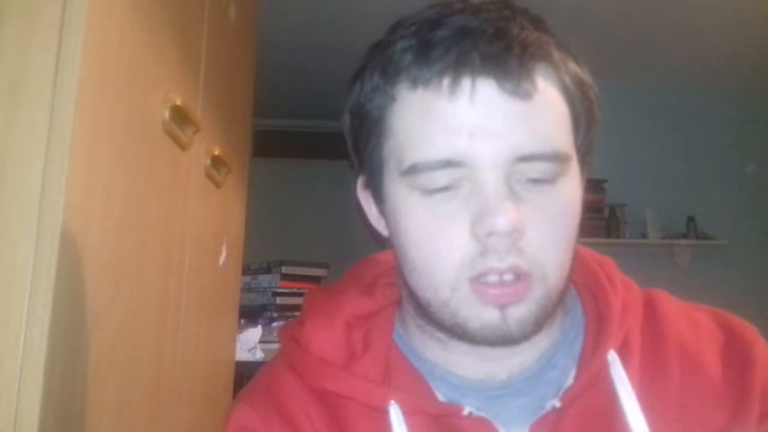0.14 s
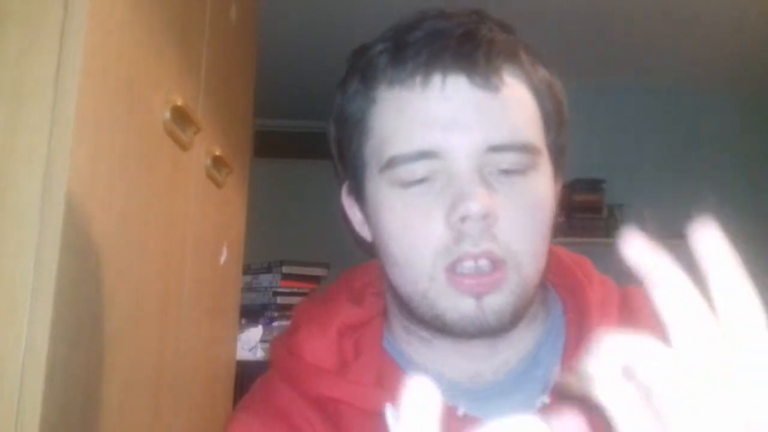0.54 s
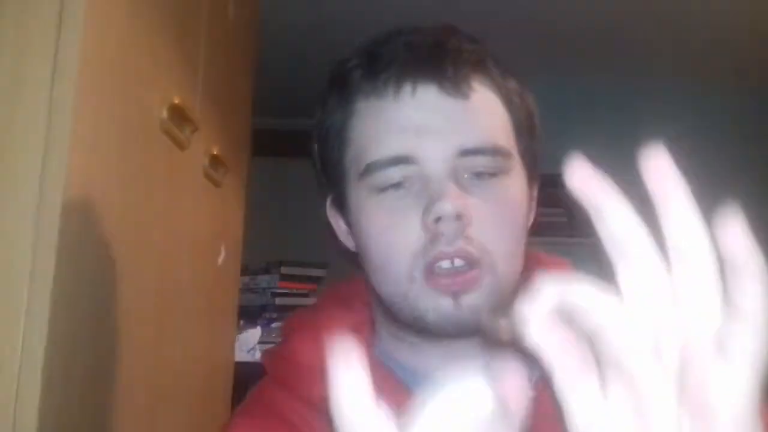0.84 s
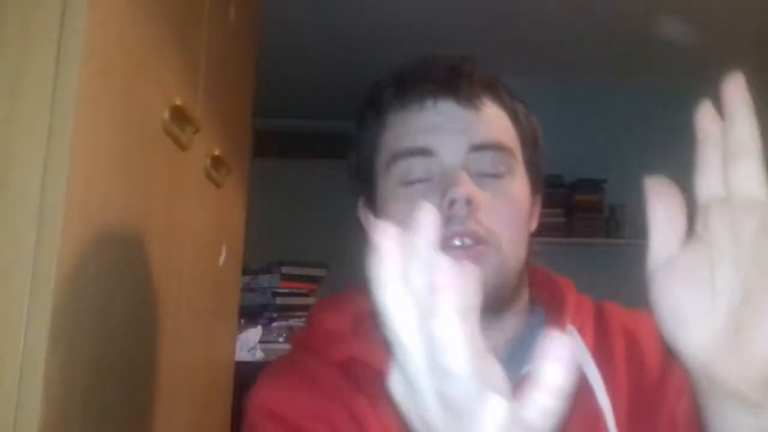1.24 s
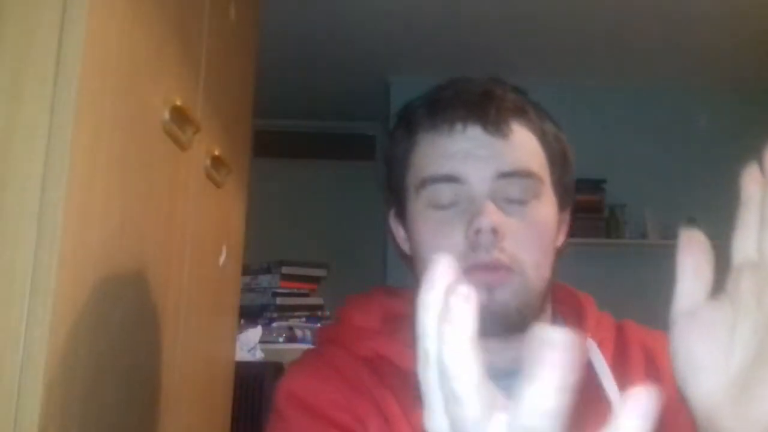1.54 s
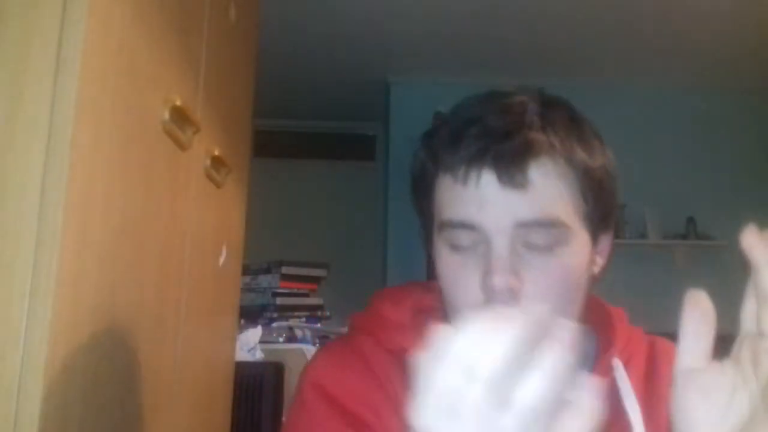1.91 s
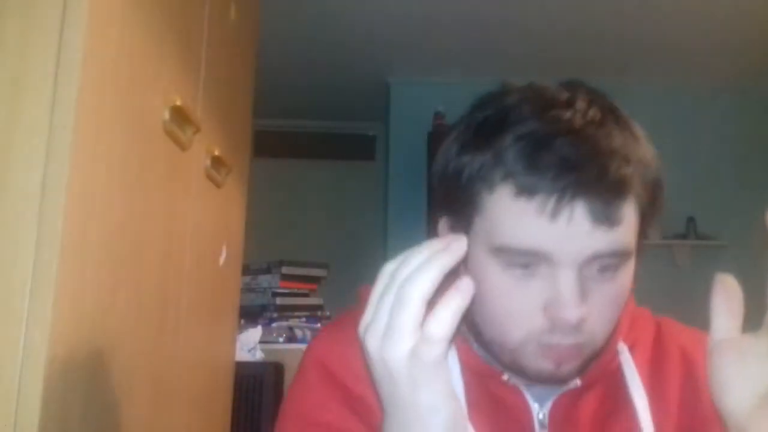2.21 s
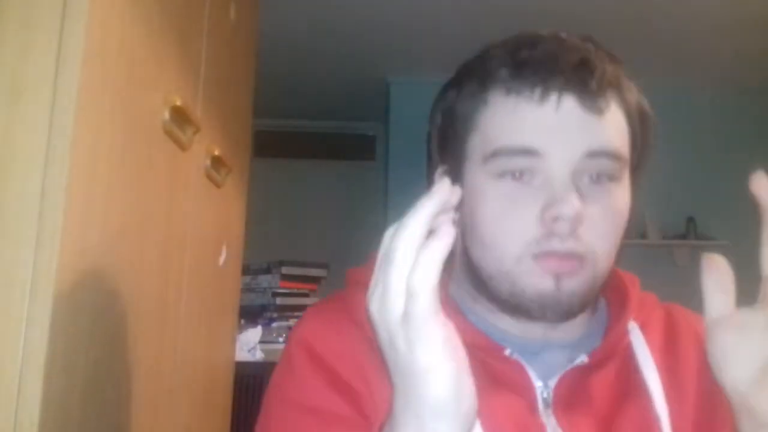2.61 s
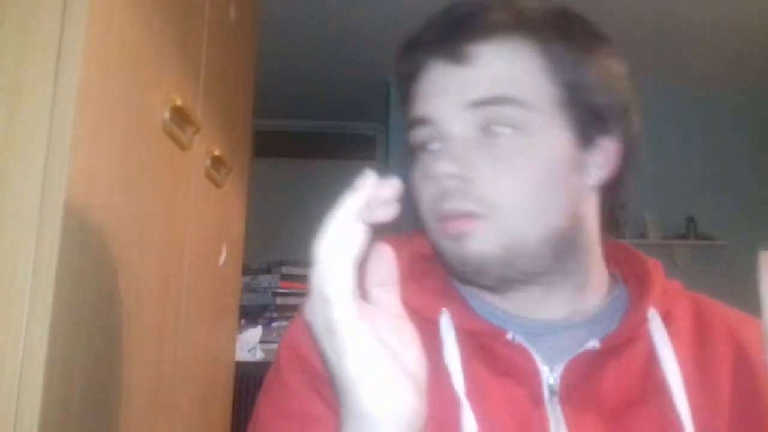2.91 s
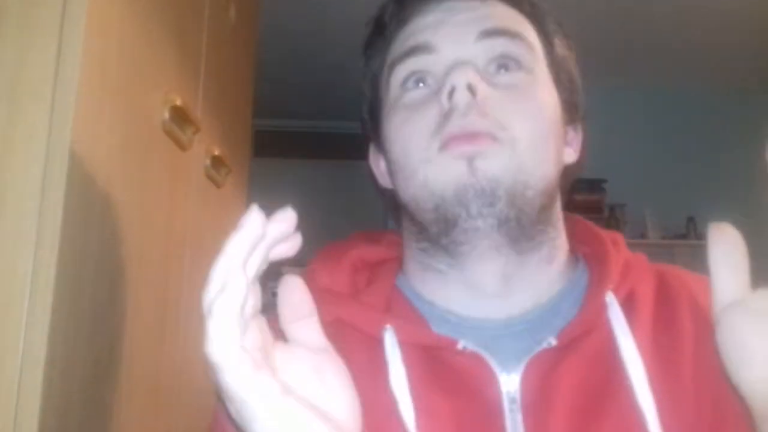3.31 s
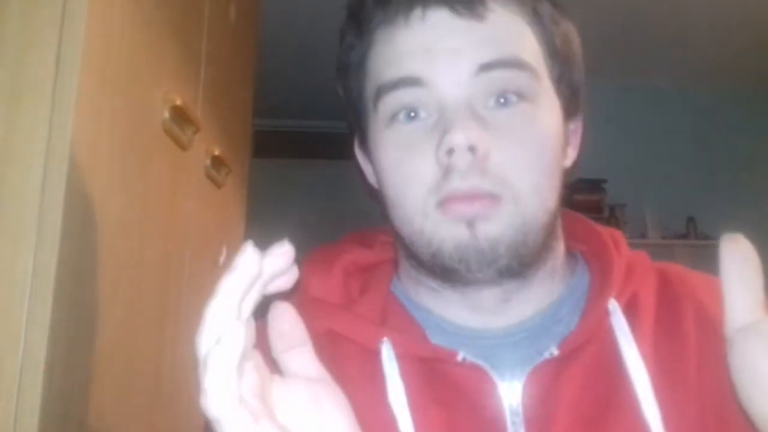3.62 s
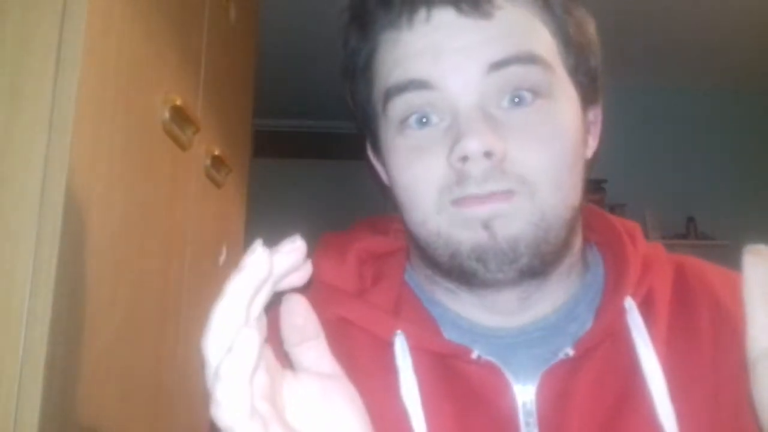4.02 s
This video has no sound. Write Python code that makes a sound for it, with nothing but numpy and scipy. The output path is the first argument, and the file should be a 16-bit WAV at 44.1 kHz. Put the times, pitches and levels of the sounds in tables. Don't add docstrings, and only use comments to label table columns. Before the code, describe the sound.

In a small quiet bedroom, soft finger thumps and nail clicks precede a coin knocking loudly on a wooden desk, bouncing and rattling away.

```python
import sys
import numpy as np
from scipy import signal
from scipy.fft import rfft, irfft
from scipy.io import wavfile
from scipy.ndimage import uniform_filter1d

SR = 44100
rng = np.random.default_rng(int(sys.argv[2]) if len(sys.argv) > 2 else 0)


def materialize(psi):
    bounded = np.clip(np.atleast_2d(psi).T, -1, 1)
    quanta = np.round(bounded * 32767).astype(np.int16)
    wavfile.write(sys.argv[1], SR, quanta)


def attenuation_scalar(level_db):
    decades = np.asarray(level_db, float) / 20
    return 10 ** decades


N = 183015

# (frequency [Hz], level [dB])
AIR_SPECTRUM = [(30, -21), (100, -2.5), (220, -1), (600, -4.5), (1500, -7), (3000, -15.5), (4200, -23.5),
                (5000, -34.5)]
# (frequency [Hz], level [dB])
HISS_SPECTRUM = [(20, -8.5), (200, 1), (1000, -1.5), (3500, -6.5), (4800, -14.5), (13000, -14),
                 (16000, -21.5)]
# (frequency [Hz], width [Hz], level [dB])
HISS_DIPS = [(5100, 1600, -3), (10020, 780, -10), (14850, 250, 5)]
# (time [s], level [dB])
GAIN_DRIFT = [(0, 4), (.4, 0), (1, 0), (1.9, 0.5), (2.399, 3), (3, 0), (3.4, 3), (3.7, -1), (4.15, -1.5)]
# (frequency [Hz], level [dB])
MICROPHONE_RESPONSE = [(40, -39.5), (150, -8), (1000, -3.5), (4050, 1), (4500, -6), (5800, -19.5),
                       (10000, -36), (16000, -48)]
# (frequency [Hz], decay time T60 [s])
ROOM_DECAY = [(200, 0.44), (600, 0.24), (1500, 0.36), (3300, 0.35), (8000, 0.43), (13000, 0.16)]
# (frequency [Hz], level [dB])
LANDING_PATHS = [
    [(100, -3), (330, -5), (650, 2.5), (2200, 2.5), (4200, -4.5), (5200, -16.5), (7500, -3.5),
     (15000, -19.5)],
    [(70, 1.5), (280, -3.5), (450, -4), (1900, 2.5), (2800, 4.5), (5000, 5.5), (9000, -3.5), (13000, 2.5)],
    [(150, -9.5), (1100, -2.5), (3300, 0.5), (4300, -3), (5300, -1.5), (7000, -7), (9000, -15),
     (15000, -14)],
]

# (strongest moment [s], length [s], dull folds [dB], bright grain [dB])
RUSTLES = [(1.011, 0.088, -45, -59.5), (1.692, 0.021, -69, -61.5), (1.786, 0.037, -59, -68),
           (2.111, 0.027, -52, -73), (2.399, 0.074, -58.5, -63), (2.522, .05, -64, -69),
           (2.785, 0.038, -84, -63.5), (2.872, 0.022, -66, -66), (2.954, .16, -66, -66),
           (3.131, 0.13, -58.5, -77.5), (3.216, 0.04, -59, -93), (3.366, 0.13, -64, -77.5)]
# (time [s], blow [dB], pitch [Hz], swings before it dies [count])
FINGER_THUMPS = [(.937, -40, 600, 4.8), (.9442, -21, 770, 3), (.9508, -24.5, 750, 4.6),
                 (.9527, -14.5, 800, 1.34), (.9595, -27, 490, 6.3), (.9680, -38, 634, 3.4),
                 (1.0003, -47, 460, 4.5), (1.0070, -38, 630, 4.9), (1.0160, -34, 493, 4.7),
                 (1.0255, -41, 480, 4.5), (1.0505, -28.5, 503, 7.2), (1.0570, -24.5, 625, 1.5),
                 (1.378, -54, 253, 24), (1.402, -52, 100, 8.4), (1.6772, -29.5, 450, 8.2),
                 (1.6845, -28.5, 767, 3.8), (1.780, -46, 480, 5.3), (1.787, -44, 587, 9),
                 (2.114, -40.5, 295, 4.1), (2.122, -41.5, 800, 11), (2.398, -36, 770, 4.5),
                 (2.510, -50, 800, 6.4), (2.5148, -39, 790, 8.5), (2.519, -35, 770, 5.8),
                 (2.526, -43, 604, 2.7), (2.5305, -33, 437, 2.2), (2.768, -43.5, 445, 5.9),
                 (2.848, -38.5, 344, 2.2), (3.046, -48, 745, 14)]
# (time [s], blow [dB], pitch [Hz], ring T60 [ms], tick [dB])
NAIL_CLICKS = [
    (0.0514, -25.5, 3080, 1.34, 9),
    (0.0908, -55, 3470, 15, -12),
    (0.578, -47.5, 1430, 16, -10),
    (1.1251, -28.5, 1920, 5.8, 8),
    (1.1256, -38, 3640, 7.8, -7),
    (1.1277, -24, 2660, 2.14, 11),
    (1.135, -38, 1000, 3.8, -10),
    (1.1438, -49, 2680, 12, -17),
    (1.145, -50, 2040, 11, -12),
]
# (time [s], blow [dB], pitch [Hz])
FLOOR_RATTLE = [
    (2.7698, -40, 1360),
    (2.77, -48.5, 3000),
    (2.847, -37, 1440),
    (2.848, -49.5, 3180),
    (2.856, -42, 1600),
    (2.865, -48, 1490),
    (3.077, -37, 800),
]

# (time [s], blow [dB], contact
# pitch [Hz], tick [dB])
DESK_CONTACTS = [
    (1.9137, -6.5, 1310, -32.5),
    (1.9172, -3, 3000, -17),
    (1.9192, -8.5, 960, -28.5),
    (1.9206, -7, 3240, -25),
]
BOUNCE_CONTACTS = [
    (2.1903, -33.5, 2930, 7.5),
    (2.1930, -12, 1183, -21),
    (2.1939, -18.5, 3570, -15),
    (2.1960, -15.5, 1850, 0.5),
    (2.1985, -8.5, 3750, -1),
    (2.2007, -6.5, 1666, -10),
    (2.2030, -9.5, 1600, -9.5),
    (2.2085, -31, 1793, -9),
    (2.2155, -13, 2560, -5.5),
    (2.2225, -22.5, 2188, -19.5),
]
LATE_BOUNCE_CONTACTS = [
    (2.255, -22.5, 1830, -18),
    (2.288, -32.5, 4130, 6),
    (2.296, -34, 1950, -2),
    (2.316, -50, 3800, 10),
    (2.33, -44, 1900, -3),
]
REBOUND_CONTACTS = [
    (2.5884, -23.5, 3120, 0.5),
    (2.5910, -26, 3300, 8.5),
    (2.5960, -22, 3570, -20),
    (2.608, -48, 3300, 0),
]
# (frequency [Hz], width [Hz], level [dB])
DESK_TOP_MODES = [(466, 47, 8.5), (800, 190, -1.5), (1150, 100, 0.5), (1577, 18, 0), (2930, 90, -33),
                  (3240, 330, -3), (3800, 500, -5.5)]
DESK_EDGE_MODES = [(480, 29, 0.5), (737, 290, 6), (787, 84, 0.5), (1600, 64, 9), (1850, 140, 3.5),
                   (3300, 350, -11.5), (3800, 220, -1.5), (4100, 62, -1), (6400, 430, -5),
                   (12400, 3900, 0.5)]
FLOOR_BOARD_MODES = [(163, 250, 9), (463, 37, 16.5), (1000, 320, -4), (1950, 690, -5.5), (3300, 74, 0),
                     (5190, 250, -3)]


def read(points, hz):
    f, value = np.transpose(points)
    return np.interp(np.log(hz + 1), np.log(f + 1), value)


def evened(x):
    return x / np.sqrt(np.mean(x ** 2) + 1e-20)


def add(mix, s, sound):
    part = mix[round(s * SR):][:len(sound)]
    part += sound[:len(part)]


def ring(hz, t60, size=2048, rise=1e-5):
    t = np.arange(size) / SR
    return attenuation_scalar(-60 * t / t60) * np.sin(2 * np.pi * hz * t) * (1 - np.exp(-t / rise))


def causal(points, size=4096):
    hz = abs(np.fft.fftfreq(size, 1 / SR))
    log_gain = np.log(attenuation_scalar(read(points, hz)))
    phase = -signal.hilbert(log_gain).imag
    return np.fft.ifft(np.exp(log_gain + 1j * phase)).real[:size // 2]


def noise(db, count=1):
    hz = np.fft.rfftfreq(N, 1 / SR)
    spectrum = rfft(rng.standard_normal((count, N))) * attenuation_scalar(db(hz))
    return evened(irfft(spectrum, N))


def room_air():
    return attenuation_scalar(-71.5) * noise(lambda hz: read(AIR_SPECTRUM, hz) - 60 * (hz > 6000))


def circuit_hiss():
    def level(hz):
        dips = sum(db / (1 + (2 * (hz - f) / width) ** 2) for f, width, db in HISS_DIPS)
        return read(HISS_SPECTRUM, hz) + dips

    gain_db = np.interp(np.arange(N) / SR, *np.transpose(GAIN_DRIFT))
    return attenuation_scalar(-69.5 + gain_db) * noise(level, count=2)


def echoes(dryness=0.66, gap=0.00085, swell=0.0062, early_db=8, early_s=0.0097, size=20000):
    taps, t = np.zeros(size), np.arange(size) / SR
    slots = np.arange(0, size - 16, 16)
    place, sign, uneven = rng.random((3, len(slots)))
    taps[slots + (16 * place).astype(int)] = np.sign(sign - .5) * attenuation_scalar(-12 * uneven)
    hz, spectrum = np.fft.rfftfreq(size, 1 / SR), rfft(taps)
    centres = np.array(ROOM_DECAY)[:, 0]
    tail = np.zeros(size)
    for row, (_, t60) in zip(np.eye(len(centres)), ROOM_DECAY):
        share = read(np.transpose([centres, row]), hz)
        tail += irfft(spectrum * share, size) * attenuation_scalar(-60 * dryness * t / t60)
    onset = np.clip((t - gap) / swell, 0, 1)
    near_walls = 1 + attenuation_scalar(early_db) * np.exp(-t / early_s)
    tail = tail * onset * near_walls
    return tail / np.linalg.norm(tail)


def sweater():
    t, out = np.arange(N) / SR, np.zeros(N)
    rise_db, folds_fall_db, grain_fall_db = 15.5, 20.5, 11.5
    strength = attenuation_scalar(3.0 * np.minimum(rng.exponential(1, N), 4))
    caught = rng.random(N) < 800 / SR
    grains = rng.standard_normal(N) * (.5 + strength * caught)
    fold_modes = ring(240, 0.016, rise=0.002) + .25 * ring(90, 0.044) + 0.45 * ring(500, .012)
    fibre_modes = ring(1600, .0016) - ring(3200, .0014)
    folds = evened(signal.fftconvolve(grains, fold_modes)[:N])
    rubbing = evened(signal.fftconvolve(grains[::-1], fibre_modes)[:N])
    for s, length, folds_db, grain_db in RUSTLES:
        before, after = np.maximum(s - t, 0) / length, np.maximum(t - s, 0) / length
        out += attenuation_scalar(folds_db - rise_db * before - folds_fall_db * after) * folds
        out += attenuation_scalar(grain_db - rise_db * before - grain_fall_db * after) * rubbing
    return out


def contact(db, hz, ring_ms, tick_db, echo_db, rise=0.061):
    knock = ring(hz, max(ring_ms, .5) / 1000, rise=rise / hz)
    knock[:2] += attenuation_scalar(tick_db) * np.array([1, -1])
    room = echoes(gap=0.0027, swell=0.0038, early_db=7.5, early_s=0.012)
    wet = attenuation_scalar(echo_db) * signal.fftconvolve(knock, room)
    add(wet, 0, knock)
    return attenuation_scalar(db) * wet


def finger_thumps(mix):
    for s, db, hz, swings in FINGER_THUMPS:
        add(mix, s, contact(db, hz, 1000 * swings / hz, tick_db=-19.5, echo_db=-3, rise=.15))


def nail_clicks(mix):
    for s, db, hz, ring_ms, tick_db in NAIL_CLICKS:
        add(mix, s, contact(db, hz, ring_ms, tick_db, echo_db=-9.5))


def floor_rattle(mix):
    for s, db, hz in FLOOR_RATTLE:
        add(mix, s, contact(db, hz, ring_ms=2.2, tick_db=-7, echo_db=6.4))


def landing(mix, rows, modes, body_db, echo_db, dryness, path):
    start, wet = rows[0][0], np.zeros(32000)
    wood = sum(attenuation_scalar(db) * width / 100 * ring(hz, 2.2 / width, size=4000) for hz, width, db in modes)
    for s, db, hz, tick_db in rows:
        grit = np.diff(rng.standard_normal(4001)) * ring(82, 0.019, size=4000)
        push = ring(hz, 3.44 / hz, size=4000, rise=0.21 / hz)
        blow = attenuation_scalar(db) * (push + attenuation_scalar(tick_db) * grit + attenuation_scalar(body_db) * wood)
        add(wet, s - start, blow)
        add(wet, s - start, attenuation_scalar(echo_db) * signal.fftconvolve(blow, echoes(dryness)))
    add(mix, start, signal.fftconvolve(wet, causal(path)))


def coin_drop(mix):
    desk_path, edge_path, floor_path = LANDING_PATHS
    landing(mix, DESK_CONTACTS, DESK_TOP_MODES, body_db=-22.5, echo_db=-1.0, dryness=1.0, path=desk_path)
    landing(mix, BOUNCE_CONTACTS + LATE_BOUNCE_CONTACTS, DESK_EDGE_MODES,
            body_db=-25, echo_db=-4.0, dryness=1.26, path=edge_path)
    landing(mix, REBOUND_CONTACTS, FLOOR_BOARD_MODES, body_db=-19, echo_db=-0.2, dryness=1.26, path=floor_path)


def scene():
    near = sweater()
    finger_thumps(near)
    nail_clicks(near)
    floor_rattle(near)
    coin_drop(near)
    heard = signal.fftconvolve(near, causal(MICROPHONE_RESPONSE))[:N]
    return (heard + room_air()) * np.ones((2, 1))


def narrowed(x):
    centre, difference = x[0] + x[1], x[0] - x[1]
    mid, side = signal.stft([centre, difference], nperseg=512)[2]
    mid_power = uniform_filter1d(abs(mid) ** 2, size=24, axis=0)
    side_power = uniform_filter1d(abs(side) ** 2, size=24, axis=0)
    kept = mid_power < attenuation_scalar(2 * 27) * side_power.mean(1, keepdims=True)
    difference = signal.istft(side * np.maximum(kept, attenuation_scalar(-31.5)), nperseg=512)[1][:N]
    return (centre + np.outer([1, -1], difference)) / 2


def band_limit(x):
    return signal.sosfilt(signal.butter(12, 15900, fs=SR, output="sos"), x)


def record(dry):
    mix = narrowed(dry + circuit_hiss()) - .00049
    return band_limit(mix)


dry = scene()
out = record(dry)
materialize(out)
```